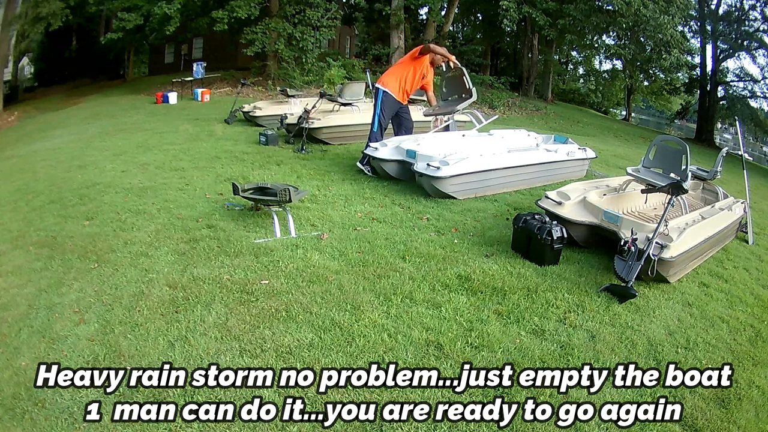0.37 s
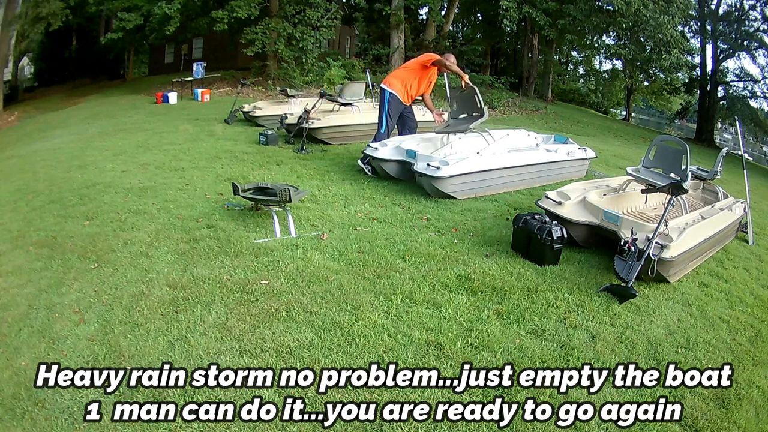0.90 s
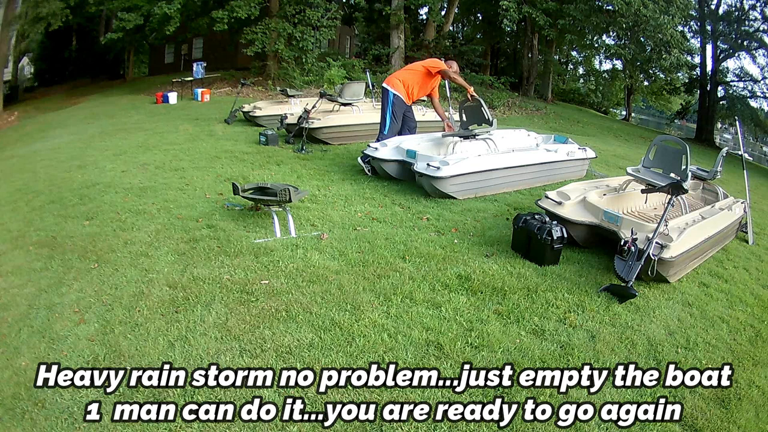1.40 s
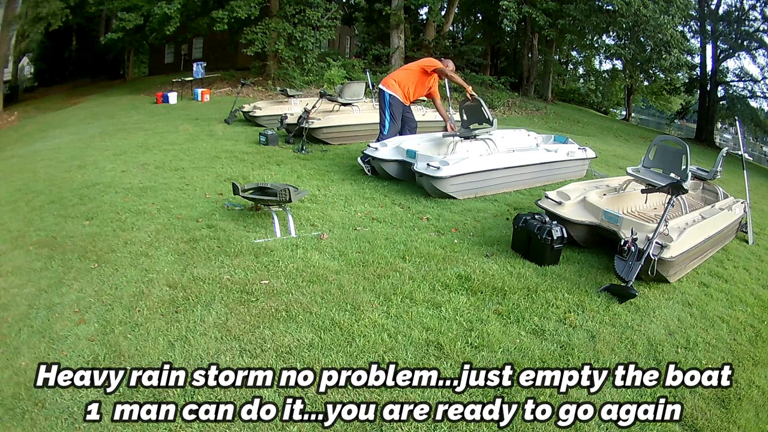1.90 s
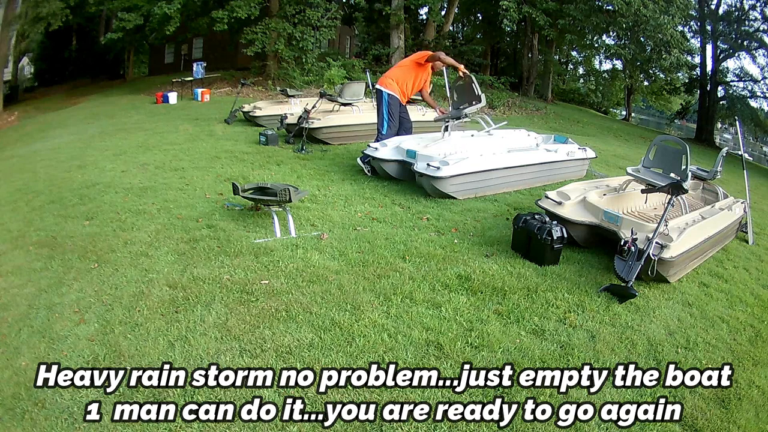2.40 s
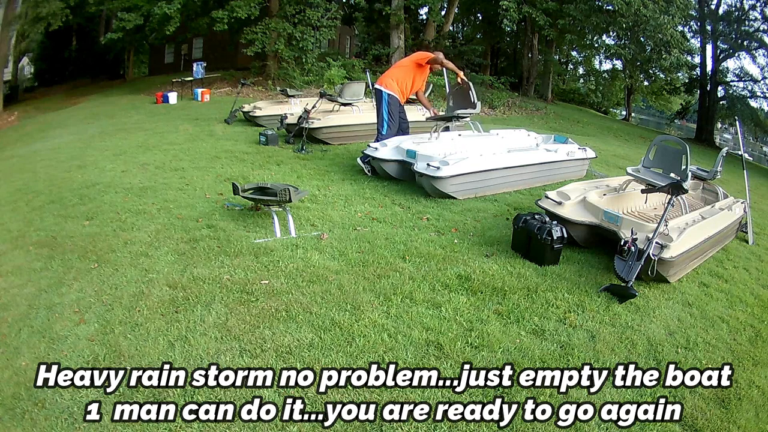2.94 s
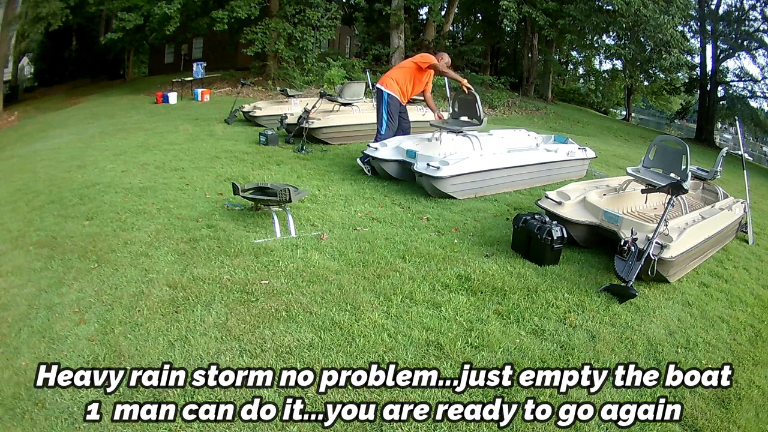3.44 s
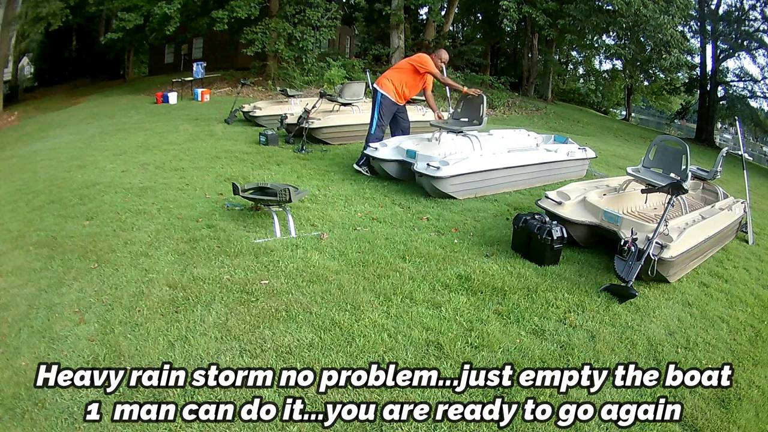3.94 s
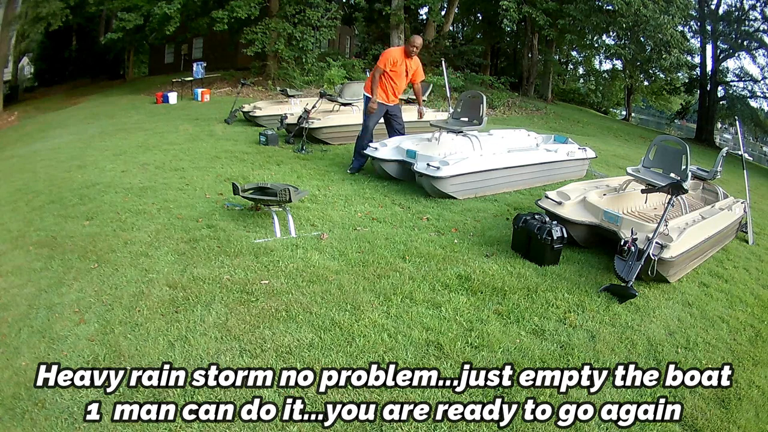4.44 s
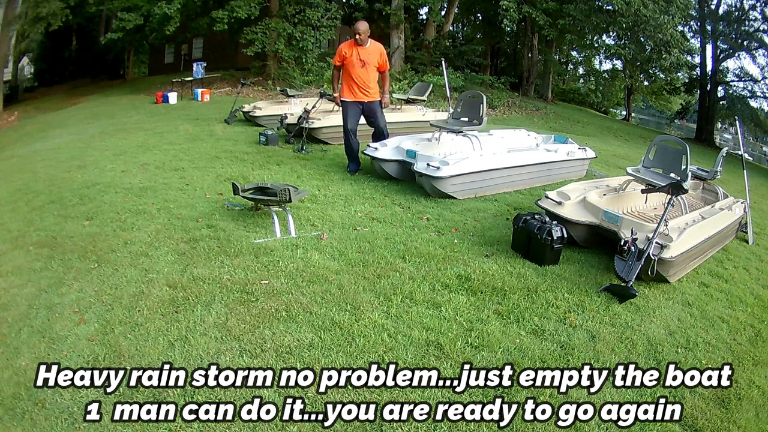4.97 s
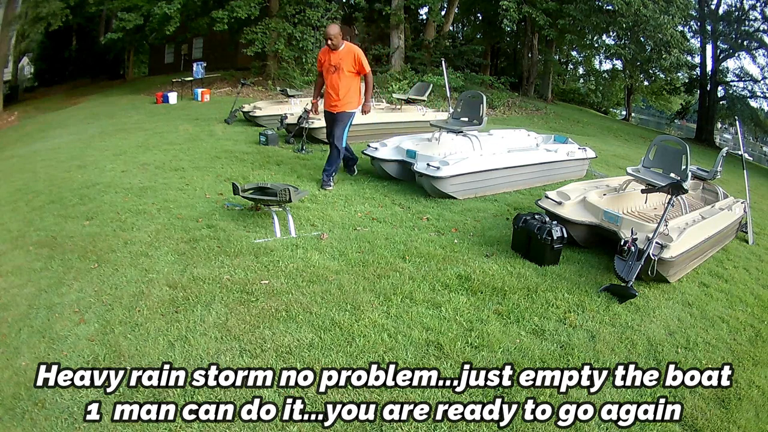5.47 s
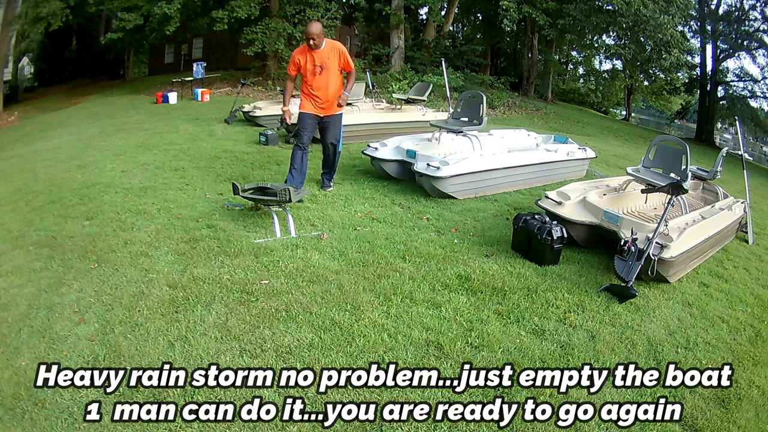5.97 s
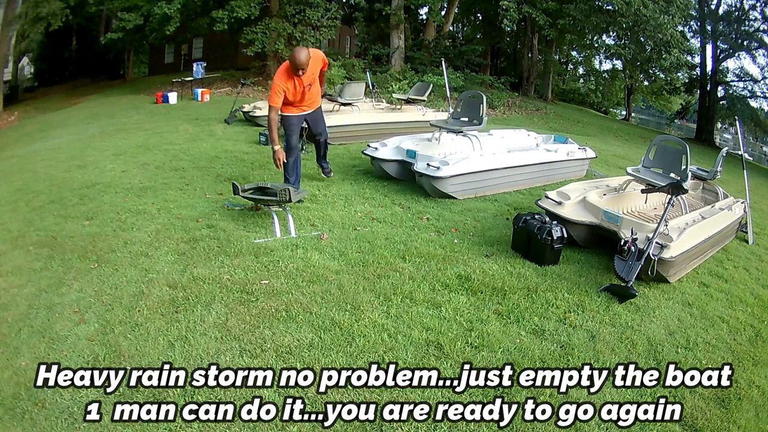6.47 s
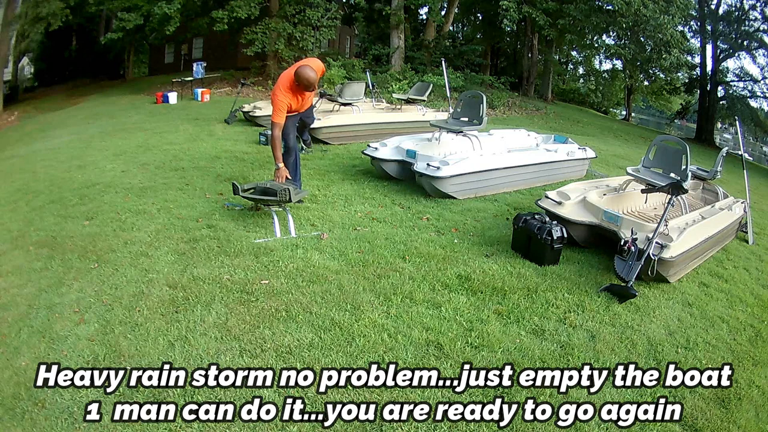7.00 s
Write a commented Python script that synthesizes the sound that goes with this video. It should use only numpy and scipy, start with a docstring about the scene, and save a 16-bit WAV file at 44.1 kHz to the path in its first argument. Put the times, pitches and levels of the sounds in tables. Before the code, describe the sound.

A quiet lawn among trees, heard in mono from about ten metres. A low, distant traffic drone runs steadily under soft microphone hiss, a faint high insect chorus and a barely audible electronic whine. At 0.6 s a seat's tube frame clacks against a hollow plastic boat hull. A stronger, boomy knock at 1.0 s starts an uneven clatter until about 1.7 s, with fast duller rebounds and a faint tubular ring; weaker taps follow until 2.2 s. After a pause, a dense, hollow thumping rattle comes at 2.9-3.1 s, then a clack with a very short scrape at 3.35 s and a last knock at 3.45 s. Everything decays quickly, with slight outdoor echoes. Then only the background remains. A bird gives a short rasping buzz around 5.4-5.65 s, small thin whistles to 5.8 s, and two fainter whistles from 6.9 s to the end at about 7.1 s.

```python
"""A lawn with trees around it: a swivel seat on a tube frame is set down and shuffled into place
on a hollow plastic boat hull, ten metres off. Blows and a short drag set the ringing tones of the hull
going: it booms, its skin clacks, and blows also make the tubes ring faintly. Filtered noise makes the
far traffic, the insects and the microphone's hiss; sines make a bird's buzz and whistles and a thin whine."""
import sys
import numpy as np
from scipy import signal
from scipy.fft import rfft, irfft
from scipy.io import wavfile

SR = 44100
rng = np.random.default_rng(int(sys.argv[2]) if len(sys.argv) > 2 else 0)


def invert_db(x):
    """Field ratio 10**(x/20) for x, a level in decibels (scalar or array-like)."""
    u = np.asarray(x, float) / 20
    return 10 ** u


def store_pcm(level_fs):
    """Save levels as 16-bit WAV."""
    pcm = np.round(np.clip(level_fs, -1, 1) * 32767).astype(np.int16)
    wavfile.write(sys.argv[1], SR, np.atleast_2d(pcm).T)


N = 313992   # length in samples

# Blows of the frame on the hull, strengths before rebounds and chance:
# start_s, clack_db, boom_db, body_db, boom_pitch_hz
BLOW_TABLE = [(0.572, -19.5, -39.5, -29.5, 192), (0.656, -31, -38, -40, 96),
              (1.031, -18, -26.5, -26.5, 194), (1.131, -25.5, -33, -34, 149), (1.147, -26.5, -32, -31, 177),
              (1.187, -31, -35, -40, 156), (1.226, -32.5, -36.5, -46, 100), (1.347, -24, -43, -33.5, 250),
              (1.512, -29.5, -33, -36.5, 272), (1.541, -34.5, -38.5, -40, 110),
              (1.581, -35.5, -40, -63, 80), (1.681, -21, -33, -35.5, 188), (1.922, -37, -36.5, -50, 133),
              (1.957, -33.5, -48, -43, 90), (2.179, -36, -49, -41, 91), (2.863, -21.5, -29, -40, 144),
              (2.872, -25, -28, -35, 124), (2.896, -40, -42, -38, 80), (2.948, -35, -34, -48, 91),
              (2.973, -34, -30, -40, 119), (3.003, -39, -37, -29, 80), (3.043, -24.5, -26, -34.5, 100),
              (3.131, -52, -46, -44, 121), (3.346, -25, -36.5, -33.5, 172), (3.452, -29, -39, -38.5, 221)]
# Where the four parts of a blow sit, in the order boom, body, clack, edge: pitch_hz
PART_HZ = [130, 420, 1050, 2400]
# Colour of the drag, one value for each part, boom, body, clack, edge: level_db
DRAG_PART_DB = [-16, -13, 2.5, -17.5]
# Ringing tones of hull and frame, the last three being the tubes:
# pitch_hz, level_db, time_to_fall_60_db_s
BOAT_MODES = [(68.5, 1, 0.082), (85.8, 2, 0.111), (110, 5, 0.13), (135, -1.5, 0.14), (182.4, -2.5, 0.15),
              (223.1, 2, 0.17), (265.5, 6.5, 0.1), (309, -4.5, 0.08), (405, 4, 0.028), (464.5, -3, 0.047),
              (541, -6, 0.053), (616, -14, 0.075), (698, -14.5, 0.058), (790, -4.5, 0.036),
              (872, -5, 0.034), (927, -17, 0.13), (1020, -11.5, 0.022), (1125, -4.5, 0.034),
              (1308, -0.5, 0.021), (1432, -4.5, 0.017), (1608, -6, 0.017), (1840, -5.5, 0.014),
              (2064, 3, 0.013), (2307, -8, 0.019), (2710, -4.5, 0.0092), (3020, -14, 0.02),
              (3660, -14, 0.008), (4140, -19.5, 0.016), (5100, -21, 0.0099), (656, -22.5, 0.33),
              (1217, -20, 0.21), (1278, -24, 0.34)]
# What each rebound loses, for boom, body, clack, edge: loss_db
REBOUND_LOSSES = [2.4, 3.1, 9.1, 13]
# Echoes from ground, boats and trees: delay_s, level_db
ECHO_TABLE = [(.0016, -16), (.031, -27), (.058, -22), (.094, -27.5), (0.149, -30)]
# Colour of the far traffic: pitch_hz, level_db (per Hz, relative)
TRAFFIC_COLOUR = [(14, -28), (22, -10), (44, 0), (75, -0.5), (115, -1.5), (150, -7), (240, -10),
                  (350, -16.5), (550, -16), (850, -16.5), (1200, -18.5), (1550, -25.5), (2040, -32),
                  (2700, -36), (3500, -68), (7700, -100)]
# Slow swell of the traffic: time_s, level_db
TRAFFIC_SWELL = [(0.0, -47), (1.2, -47.5), (3.0, -48), (4.5, -48), (7.12, -47.5)]
# Colour of the microphone's hiss: pitch_hz, level_db (per Hz, relative)
HISS_COLOUR = [(1650, -31), (2800, -0.5), (5760, -5.5), (6940, -5.5), (8190, -10), (9060, -8.5),
               (10700, -10), (15700, -6.5)]
# Steady thin tones of the electronics: pitch_hz, level_db (rms)
WHINE_TONES = [(3876, -93), (9097, -102), (9176, -99), (9256, -92), (9335, -92), (9413, -99), (11235, -95),
               (11265, -96), (15573, -101)]
# The bird's buzzy call: time_s, centre_hz, width_hz, level_db
BUZZ_PATH = [(5.365, 5950, 900, -95), (5.39, 5850, 905, -66), (5.43, 5640, 900, -68),
             (5.48, 5380, 2500, -67), (5.6, 5740, 3010, -69.5), (5.66, 6200, 1500, -91)]
# The bird's thin whistles: start_s, length_s, pitch_hz, level_db
WHISTLE_NOTES = [(5.553, 0.065, 2510, -74), (5.68, 0.043, 2440, -67.5), (5.734, .07, 2410, -64),
                 (6.87, 0.12, 2430, -74), (6.977, .2, 2430, -73)]


def in_time(rows):
    """Draws straight lines between the rows of a table: one curve over time per column."""
    s, *columns = np.transpose(rows)
    return [np.interp(np.arange(N) / SR, s, c) for c in columns]


def rms_one(x):
    """Scales a sound to an rms (average strength) of one."""
    return x / np.sqrt(np.mean(x ** 2) + 1e-20)


def drift(rate_hz):
    """Slow random wandering with spread 1: noise smoothed twice, made at every 40th sample."""
    r = np.exp(-80 * np.pi * rate_hz / SR)
    noise = rng.standard_normal(N // 40 + 4002)
    slow = signal.lfilter([1], [1, -2 * r, r * r], noise)[4000:]   # drop the start-up
    return np.interp(np.arange(N) / 40, np.arange(len(slow)), rms_one(slow))


def coloured(spectrum):
    """Steady noise with the given balance of low and high pitches, rms 1."""
    hz, level_db = np.transpose(spectrum)
    grid_hz = np.maximum(np.fft.rfftfreq(N, 1 / SR), 1)
    shape = invert_db(np.interp(np.log(grid_hz), np.log(hz), level_db))
    return rms_one(irfft(rfft(rng.standard_normal(N)) * shape, N))


def envelope_db(start_s, length_s, attack_s, release_s):
    """Rises 30 dB to its top, holds and falls again; next to nothing outside."""
    hold_s = max(length_s - attack_s, .001)
    corners_s = start_s + np.cumsum([-.001, .001, attack_s, hold_s, release_s, .001])
    return np.interp(np.arange(N) / SR, corners_s, [-200, -30, 0, 0, -30, -200])


def hiss():
    """The microphone's own steady coloured noise."""
    return invert_db(-68) * coloured(HISS_COLOUR)


def whine():
    """Steady sines from the electronics, each starting at a random point of its cycle."""
    t = np.arange(N) / SR
    tones = 0
    for hz, level_db in WHINE_TONES:
        tones = tones + np.sqrt(2) * invert_db(level_db) * np.sin(2 * np.pi * (hz * t + rng.random()))
    return tones


def traffic():
    """A far drone: coloured noise that swells slowly and wanders a little."""
    level_db = in_time(TRAFFIC_SWELL)[0]
    return invert_db(level_db + .5 * drift(0.46)) * coloured(TRAFFIC_COLOUR)


def insects():
    """A far chorus: noise sent twice through one resonance, its level wavering."""
    centre_hz, width_hz, level_db = 6960, 370, -78.5   # width of a single pass
    r, w = np.exp(-np.pi * width_hz / SR), 2 * np.pi * centre_hz / SR
    chorus = rng.standard_normal(N)
    for _ in range(2):
        chorus = signal.lfilter([1, 0, -1], [1, -2 * r * np.cos(w), r * r], chorus)
    return invert_db(level_db + 1.9 * drift(1.5)) * rms_one(chorus)


def buzz(pulses_per_s=55, depth=0.51):
    """The bird's buzz: twelve wandering sines around a moving centre, chopped into uneven pulses."""
    centre_hz, width_hz, level_db = in_time(BUZZ_PATH)
    voice = 0
    for place in np.linspace(-.5, .5, 12):
        hz = centre_hz + width_hz * (place + 0.18 * drift(89))
        voice = voice + np.sin(2 * np.pi * np.cumsum(hz) / SR)
    pulse_phase = 2 * np.pi * pulses_per_s * np.arange(N) / SR + 2 * drift(22)
    chop = 1 + depth * np.sin(pulse_phase)
    audible = level_db > -94   # cuts the faint start; the faint end lingers on quietly
    return invert_db(level_db) * audible * rms_one(voice * chop)


def whistle(waver_db=1.5, octave_db=-11, attack_s=0.015, release_s=0.045):
    """The bird's whistles: a sine and its octave, wavering in pitch and level."""
    wavering_time = np.cumsum(1 + 0.00634 * drift(55)) / SR
    notes = 0
    for start_s, length_s, hz, level_db in WHISTLE_NOTES:
        phase = 2 * np.pi * hz * wavering_time
        tone = np.sin(phase) + invert_db(octave_db) * np.sin(2 * phase)
        notes = notes + invert_db(level_db + envelope_db(start_s, length_s, attack_s, release_s)) * tone
    return invert_db(waver_db * drift(35)) * notes


def outdoors(x, dull_hz=1800):
    """Adds a few late copies whose treble is softened, as from ground, boats and trees."""
    dull = signal.lfilter(*signal.butter(1, dull_hz, fs=SR), x)
    echoes = 0
    for delay_s, level_db in ECHO_TABLE:
        echoes = echoes + invert_db(level_db) * np.r_[np.zeros(int(delay_s * SR)), dull][:N]
    return x + echoes


def touchdowns():
    """The frame rocks: each blow rebounds twice, later, duller and with a deeper boom."""
    gap_s, jitter, pitch_ratio = .011, 0.291, 0.69
    s, clack, boom, body, boom_hz = np.transpose(BLOW_TABLE)
    # the sharp edge follows clack and boom, from its level in a middling blow
    edge = -45.5 + 1 * (clack + 25) + 0.37 * (boom + 36)
    levels = np.c_[boom, body, clack, edge]
    gaps = gap_s * (1 + jitter * rng.uniform(-1.02, 1, (len(s), 2)))
    times = s[:, None] + np.c_[0 * s, np.cumsum(gaps, axis=1)]
    k = np.arange(3)   # the blow and its two rebounds
    pitches = boom_hz[:, None] * pitch_ratio ** k
    levels = levels[:, None] - k[:, None] * np.array(REBOUND_LOSSES)
    return times.ravel(), pitches.ravel(), levels.reshape(-1, 4)


def chatter(count, size, touch_per_s=1200, first=0.69, fade_s=0.007):
    """Each blow is a first touch and a dying rattle of random contacts, all blows of equal energy."""
    t = np.arange(size) / SR
    touching = rng.random((count, size)) < touch_per_s / SR
    contact = touching * rng.standard_normal((count, size)) * np.exp(-t / fade_s)
    contact[:, 0] = first   # relative to the rattle
    return contact / np.sqrt(np.sum(contact ** 2, axis=1, keepdims=True))


def drag(rub_per_s=1900):
    """The frame is dragged into place: random tiny rubs that swell and fade in slipping jerks."""
    start_s, length_s, level_db, attack_s, release_s = 3.345, 0.11, -47, 0.019, 0.027
    jerks_per_s, jerk_db = 19.6, 1.5
    jerks = jerk_db * np.sin(2 * np.pi * jerks_per_s * (np.arange(N) / SR - start_s))
    drag_db = level_db + jerks + envelope_db(start_s, length_s, attack_s, release_s)
    return (rng.random(N) < rub_per_s / SR) * rng.standard_normal(N) * invert_db(drag_db)


def ring(force, hz, t60_s):
    """A single click sets a dying sine ringing, with a height of about 1."""
    r, w = invert_db(-60 / (t60_s * SR)), 2 * np.pi * hz / SR
    return signal.lfilter([0, np.sin(w)], [1, -2 * r * np.cos(w), r * r], force + 1e-18)


def boat():
    """Blows and drag push on every ringing tone of hull and tubes, each with its own strength."""
    # chance in how strongly a blow feeds a tone; the minus sign only flips the draw
    hull_spread_db, tube_spread_db = 3.5, -2.5
    seated_s, seated_db = 2.5, -14   # from here the frame stays pressed on the hull
    push_cycles, panel_db_per_octave = 1.71, 7
    s, boom_hz, levels = touchdowns()
    size = 2048   # samples of contact in each blow
    contact = chatter(len(s), size)
    first_push = np.arange(size)[None] == 0
    at = np.round(s * SR).astype(int)[:, None] + np.arange(size)
    luck = rng.standard_normal((len(s), len(BOAT_MODES)))
    rub = drag()
    out = np.zeros(N)
    for k, (hz, level_db, t60_s) in enumerate(BOAT_MODES):
        is_tube = k >= len(BOAT_MODES) - 3
        place = np.log(hz), np.log(PART_HZ)
        colour = np.array([np.interp(*place, row) for row in levels])
        force, spread_db = np.zeros(N), tube_spread_db
        if is_tube:   # tubes pressed on the hull hardly ring
            colour = colour + seated_db * (s > seated_s)
        else:   # only the hull feels the drag
            force = rub * invert_db(np.interp(*place, DRAG_PART_DB) + level_db)
            spread_db = hull_spread_db
        touches = contact
        if hz < 300:   # the struck panel booms at its own pitch and feels only the first push
            colour = colour - panel_db_per_octave * abs(np.log2(hz / boom_hz))
            touches = first_push
        strength_db = colour + level_db + spread_db * luck[:, k]
        np.add.at(force, at, touches * invert_db(strength_db)[:, None])
        # a panel takes about a cycle to start moving
        force = signal.lfilter(*signal.iirpeak(hz, push_cycles, fs=SR), force)
        # neighbours, four at a time, start in step: a sharp crack
        out += (-1) ** (k // 4) * ring(force, hz, t60_s)
    # the hull radiates little below its first tone
    return signal.lfilter(*signal.butter(2, 55, "high", fs=SR), out)


def scene():
    """The boat on the lawn with traffic, insects and bird around it, as one channel."""
    return (outdoors(boat()) + traffic() + insects() + buzz() + whistle())[None]


def band_limit(x):
    """A steep low-pass at the top of the band."""
    return signal.sosfilt(signal.butter(12, 15820, fs=SR, output="sos"), x)


def record(dry):
    """The microphone adds the thin tones of its electronics and its hiss."""
    mix = dry + whine() + hiss()
    return band_limit(mix)


dry = scene()
out = record(dry)
store_pcm(out)
```